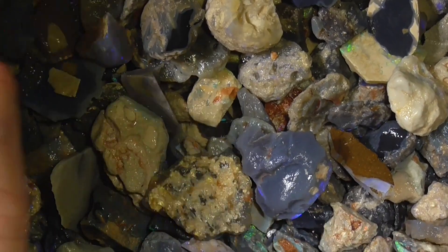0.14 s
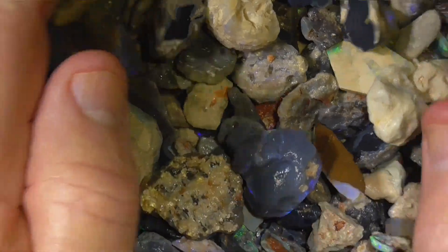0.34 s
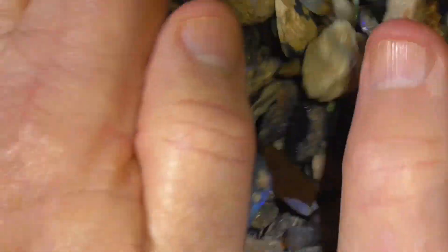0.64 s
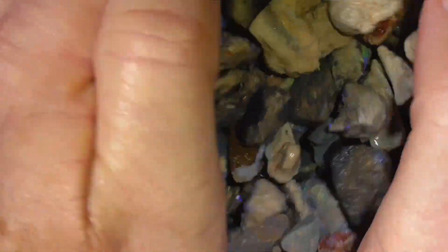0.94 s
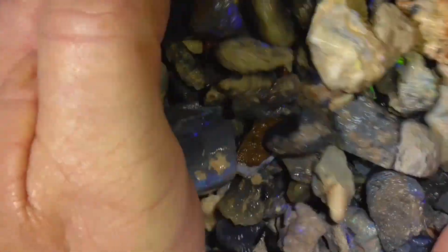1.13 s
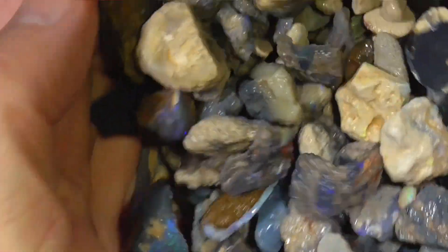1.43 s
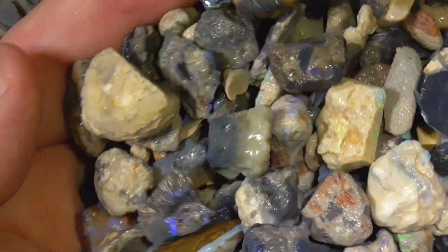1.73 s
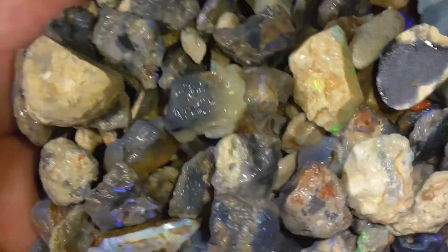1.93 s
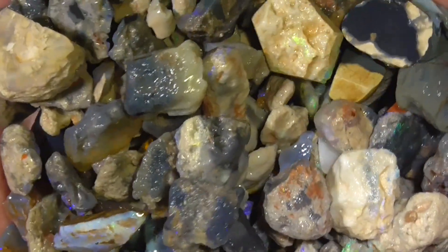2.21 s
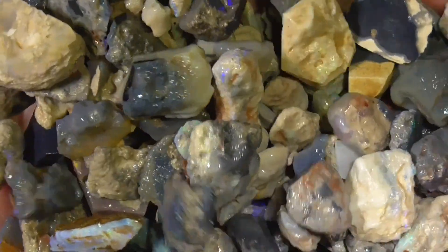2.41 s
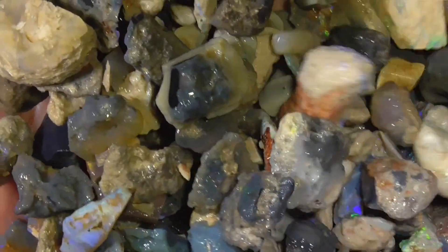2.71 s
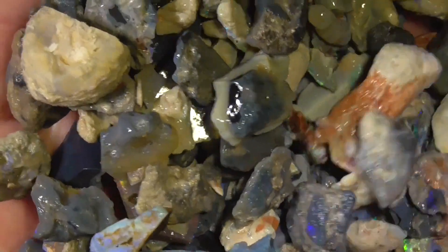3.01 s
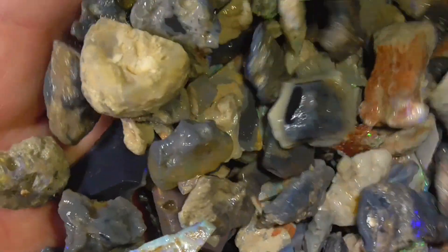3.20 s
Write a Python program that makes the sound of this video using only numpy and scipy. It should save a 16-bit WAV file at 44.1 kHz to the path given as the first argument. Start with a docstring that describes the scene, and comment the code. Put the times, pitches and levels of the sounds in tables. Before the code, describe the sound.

Small rough stones, very close and dry. A scrap of grinding fades at once to near quiet, then at 0.2 s a hand digs in with dense, crisp crunching and short scrapes. It brightens until a very hard clack at 1.27 s briefly ducks everything. A soft scrape follows around 1.5 s; thinner grinding carries scattered clacks, a hollow knock at 2.13 s, a flurry near 2.8 s and bright clinks after 3.05 s.

```python
"""Small rough stones grind in a tub as a hand digs in and lifts a handful, close to the microphone.
The grinding is made of countless tiny contacts, each rub passed through the short ring of a stone.
Single stones clack in bursts of noise and clink in pairs of sines; the tub answers with low, dull notes.
Soft scrapes of filtered slips, a short room tail and a faint steady hush lie around them.
One very hard clack makes the recorder's limiter duck, and the sound swells back."""
import sys
import numpy as np
from scipy import signal
from scipy.io import wavfile
from scipy.ndimage import uniform_filter1d

SR = 44100
rng = np.random.default_rng(int(sys.argv[2]) if len(sys.argv) > 2 else 0)


def output_pcm(signal):
    """Save a mono or channel-first signal as 16-bit PCM at the path in sys.argv[1].

    Samples are clipped to [-1, 1] before scaling.
    """
    pcm = np.clip(np.atleast_2d(signal).T, -1, 1) * 32767
    wavfile.write(sys.argv[1], SR, np.round(pcm).astype(np.int16))


N = 147735  # length in samples

# Tone colours of a contact: bright tick, middle crack and dull thud.
# Each row: frequency in Hz, relative level in dB per Hz.
TICK_COLOUR = [(2500, -76), (5000, -21), (6500, -7.5), (8200, 5.5), (10200, 6), (12200, -2), (14000, -5.5),
               (16000, -19)]
CRACK_COLOUR = [(100, -67), (1300, -13), (2050, 7), (4400, 3.5), (6500, 0.5), (10000, 1), (16000, -47.5)]
THUD_COLOUR = [(40, -22), (100, -17), (160, -7.5), (400, -9), (800, 3.5), (1400, -1.5), (2500, -3.5),
               (8000, -60.5)]

# How often one rubbing stone makes contact at the given body level; the rate doubles every so many dB
CONTACTS_PER_S, CONTACTS_DB, CONTACTS_DOUBLE_DB = 1800, -22, 12.5
# Contacts and rubs differ in size; a rub peaks after RUB_S
SIZE_SPREAD_DB, CLUMP_DB, RUB_S = 3, 1, 0.0091
# Each rub starts with one dry tick, a few of them much harder
TOUCH_DB, TOUCH_SPREAD_DB = -5.5, 5.5
STONE_LO_HZ, STONE_HI_HZ = 1100, 13030
STONE_T60_S, STONE_RING_DB, CHIP_T60_S = 0.024, -18.5, 0.0019
# Stereo width: level of the side signal for bright and for duller sounds
SIDE_TICK_DB, SIDE_BODY_DB = -15, -41
# Ring of the tub beside its thud: a whole stone rings it more than grinding does
TUB_DB, KNOCK_RING_DB = 6, 16.5
CRACK_DB, CRACK_FOLLOWS_TICKS = -0.5, 0.24  # the follow share is a fraction
# In a clack the faces scuff, meet and chatter; then the neighbours settle
CLACK_LEAD_S, CLACK_T60_S, SETTLE_DB, SETTLE_T60_S = 0.0048, 0.0099, -12, 0.078
GRIT_SPREAD_DB, THUD_CHATTER = 7.5, 0.43  # the thud chatter is a factor
SLIPS_PER_S = 2000
ROOM_DB, ROOM_T60_S = -17, 0.053
HUSH_DB = -50
LIMIT_DB, RECOVER_DB_PER_S = 2, 88.5
EDGE_HZ = 15900  # upper limit of the sound


def amp(db):
    """Turns dB into an amplitude factor."""
    return 10 ** (np.asarray(db) / 20)


def evened(x):
    """Scales a signal to an rms of 1."""
    return x / np.sqrt(np.mean(x ** 2) + 1e-20)


def steady(x, size=2600):
    """Divides out the slow swings in loudness, so that a level curve can shape the sound."""
    power = uniform_filter1d((x ** 2).mean(0), size)
    return x / np.sqrt(uniform_filter1d(power, size // 2) + 1e-12)


def topped(x, size):
    """Scales a hit so that its loudest moment has rms 1."""
    return x / np.sqrt(uniform_filter1d((x ** 2).mean(0), size).max())


def add(mix, s, sound):
    """Adds a sound at s seconds and cuts what runs past the end."""
    part = mix[:, round(s * SR):][:, :sound.shape[-1]]
    part += sound[..., :part.shape[1]]


def seconds(size):
    """Time of each sample in seconds."""
    return np.arange(size) / SR


def dying(t, t60):
    """Decay that falls by 60 dB in t60 seconds."""
    return np.exp(-np.log(1000) * t / t60)


def through(x, response):
    """Convolves each channel and keeps the length."""
    return signal.fftconvolve(np.atleast_2d(x), np.atleast_2d(response), axes=1)[:, :x.shape[-1]]


def colour(points, size=4096):
    """Causal impulse response of energy 1 with the given spectrum."""
    hz, db = np.transpose(points)
    grid_hz = abs(np.fft.fftfreq(size, 1 / SR)) + 1
    log_gain = np.log(amp(np.interp(np.log(grid_hz), np.log(hz), db)))
    # Minimum phase puts the energy as early as the spectrum allows
    h = np.fft.ifft(np.exp(np.conj(signal.hilbert(log_gain)))).real
    return h / np.linalg.norm(h)


def stereo(pair, side_db):
    """Left and right from a middle and a side signal."""
    return pair[0] + amp(side_db) * np.array([pair[1], -pair[1]])


def stone(size=1500, count=7):
    """One stone in its nook: a gritty snap and a few quickly damped modes, most of them high."""
    t = seconds(size)
    hz = STONE_LO_HZ * (STONE_HI_HZ / STONE_LO_HZ) ** np.sqrt(rng.random((count, 1)))
    phase = rng.random((2, count, 1))  # separate for middle and side
    modes = np.sqrt(hz / STONE_HI_HZ) * np.sin(2 * np.pi * (hz * t + phase))
    ring = modes.sum(1) * dying(t, STONE_T60_S)
    snap = rng.standard_normal((2, size)) * dying(t, CHIP_T60_S)
    h = snap + amp(STONE_RING_DB) * ring
    return h / np.linalg.norm(h[0])


def tub(ring_db):
    """Answer of the pile and its tub to one push: a dull thud and a few short modes."""
    # Ring of the tub. Each row: pitch in Hz, level in dB before filtering, time to fall 60 dB in s.
    tub_modes = [(337, -7, 0.041), (512.2, 1.5, 0.046), (684.6, -5.5, 0.073), (779, 1.5, 0.032),
                 (1150, 3, 0.005), (1497, -11, 0.11)]
    thud = colour(THUD_COLOUR)
    t = seconds(len(thud))
    ring = np.zeros(len(thud))
    for k, (hz, db, t60) in enumerate(tub_modes):
        ring += amp(db) * dying(t, t60) * np.sin(2 * np.pi * hz * t) * (-1) ** k
    # A difference lifts the treble, then a gentle lowpass above the first mode tames it
    ring = through(ring, np.array([1., -1.]))[0]
    ring = signal.lfilter([1], [1, -np.exp(-2 * np.pi * tub_modes[0][0] / SR)], ring)
    return thud + amp(ring_db) * ring / np.linalg.norm(ring)


def grinding(count=650, size=3500):
    """One stone after another rubs in a fit of tiny contacts; harder digging makes them denser."""
    # Loudness of the grinding pile.
    # Each row: time in s, level of the bright ticks in dB, level of the dull body in dB.
    grind_levels = [(0, -31, -34), (0.035, -42.5, -44), (0.061, -66, -53), (0.168, -69, -51.5),
                    (0.2, -23, -24), (0.292, -18.5, -24.5), (0.333, -24, -25), (0.368, -17.5, -22.5),
                    (.49, -19, -22.5), (.61, -24, -22), (.67, -17, -21), (.84, -17, -21.5),
                    (0.958, -23, -28.5), (0.997, -20, -26.5), (1.09, -15.5, -24), (1.159, -15.5, -26),
                    (1.19, -24, -27), (1.262, -12.5, -26.5), (1.3, -17.5, -26.5), (1.53, -25, -31.5),
                    (1.701, -19, -32.5), (1.746, -24, -36), (1.95, -25, -34), (1.985, -25.5, -34.5),
                    (2.03, -22.5, -32), (2.095, -29, -31.5), (2.302, -26, -32.5), (2.35, -28.5, -37.5),
                    (2.41, -34, -37), (2.46, -23.5, -39), (2.62, -31, -39.5), (2.75, -18, -38.5),
                    (2.825, -28, -35), (2.91, -23, -35), (2.98, -29.5, -38.5), (3.2, -32.5, -43),
                    (3.35, -43, -35.5)]
    s, tick_db, body_db = np.transpose(grind_levels)
    t, age = seconds(N), seconds(size) / RUB_S
    tick_db, body_db = np.interp(t, s, tick_db), np.interp(t, s, body_db)
    rate = CONTACTS_PER_S * 2 ** (np.maximum(body_db - CONTACTS_DB, -15) / CONTACTS_DOUBLE_DB)
    snaps = np.zeros((2, N))
    for start in (np.arange(count) + rng.random(count)) * N / count:
        size_db = SIZE_SPREAD_DB * np.minimum(rng.exponential(1, size), 4)
        size_db = size_db + CLUMP_DB * np.clip(rng.standard_normal(), -2, 2)
        happens = rng.random(size) < rate[int(start)] / SR
        contacts = happens * amp(size_db) * rng.choice([-1, 1], size)
        touch = (age == 0) * amp(TOUCH_DB + TOUCH_SPREAD_DB * min(rng.exponential(), 4))
        rub = touch + contacts * age * np.exp(-age)
        add(snaps, start / SR, through(rub, stone()))

    crack_db = CRACK_DB + body_db + CRACK_FOLLOWS_TICKS * (tick_db - body_db)
    pressed = np.sqrt(amp(np.minimum(body_db - CONTACTS_DB, 0)))  # harder digging rings the tub more
    near, low = stereo(snaps, SIDE_TICK_DB), stereo(snaps, SIDE_BODY_DB)
    ticks = steady(through(near, colour(TICK_COLOUR)))
    cracks = steady(through(low, colour(CRACK_COLOUR)))
    loose_body = (1 - pressed) * through(low, colour(THUD_COLOUR))
    ringing_body = pressed * through(low, tub(TUB_DB))
    body = steady(loose_body + ringing_body)
    return amp(tick_db) * ticks + amp(crack_db) * cracks + amp(body_db) * body


def hush():
    """A faint steady noise with its own tone colour lies under the stones."""
    # Tone colour of the hush. Each row: frequency in Hz, relative level in dB per Hz.
    hush_colour = [(50, -30.5), (350, 5.5), (1000, 1), (4000, -16)]
    noise = stereo(rng.standard_normal((2, N)), side_db=-7)
    return amp(HUSH_DB) * through(noise, colour(hush_colour))


def hand():
    """Slips under the hand sound hollows; their pitch falls as it closes in, rises as it lifts."""
    # Scrapes of stones sliding under the hand. Each row: middle in s, spread in s, pitch in Hz,
    # glide in octaves per s, width of the resonance in Hz, level in dB.
    scrapes = [(.135, 0.029, 352, -0.5, 70, -44.5), (0.302, 0.025, 2780, -41, 1100, -26),
               (.39, 0.051, 1700, -10, 1420, -25.5), (1.455, .012, 171, -18, 50, -35),
               (1.5, 0.085, 1460, 1.5, 260, -31), (1.54, 0.03, 665, 1, 512, -28.5),
               (2.73, 0.055, 4600, 0.5, 2680, -32.5)]
    t, out = seconds(N), np.zeros(N)
    for s, spread, hz, glide, width, db in scrapes:
        gliding_hz = hz * 2 ** np.clip(glide * (t - s), -1, 1)
        turn = np.exp(2j * np.pi * np.cumsum(gliding_hz) / SR)
        slips = rng.standard_normal(N) * (rng.random(N) < SLIPS_PER_S / SR)
        # Shift the gliding pitch down to zero, let it ring there, and shift it back
        ring = (turn * through(slips / turn, t * np.exp(-np.pi * width * t))[0]).real
        ring = signal.sosfilt(signal.butter(2, hz / 2, "highpass", fs=SR, output="sos"), ring)
        swell = np.exp(-.5 * ((t - s) / spread) ** 2)
        out += amp(db) * evened(ring) * swell
    return out


def clacks(size=5000):
    """Rough faces meet in a short chatter that rings the stone, cracks and thuds into the tub."""
    # Single stones knocking together. Each row: time in s, level of the bright tick in dB,
    # level of the middle crack in dB, level of the thud into the tub in dB.
    knocks = [(0.1979, -9.5, -47, -34), (0.297, -9, -22, -49), (.4864, -8, -38, -16),
              (0.895, -19, -16.5, -32), (1.2043, -12, -17.5, -54), (1.2701, -9, -4, -15),
              (1.4085, -9.5, -35, -23.5), (1.5285, -21, -25, -30), (1.641, -14, -18, -29.5),
              (1.6649, -12.5, -38, -53.5), (1.772, -9, -27, -46), (1.799, -12.5, -40, -45),
              (1.8340, -14.5, -19.5, -21.5), (1.842, -16, -38, -28), (1.881, -24, -20.5, -30.5),
              (2.0806, -12, -31, -53), (2.1297, -26, -14.5, -15), (2.146, -12, -20, -25),
              (2.1773, -9.5, -35, -31), (2.2450, -18, -16, -21.5), (2.2849, -9, -29, -25),
              (2.3754, -8.5, -29, -39), (2.3804, -14.5, -25, -36.5), (2.422, -14.5, -24, -31.5),
              (2.427, -13, -42, -41), (2.544, -23, -40, -34.5), (2.628, -19.5, -29, -33),
              (2.7712, -9, -21, -32), (2.7873, -7.5, -26, -29), (2.7940, -12, -20.5, -27),
              (2.8049, -16, -32, -31), (2.9342, -13, -31, -29.5), (3.069, -26, -23.5, -39),
              (3.0794, -14, -18.5, -19), (3.1279, -17, -26.5, -33.5), (3.1624, -11, -21.5, -34.5),
              (3.2165, -18.5, -37, -69), (3.2369, -12, -8, -29), (3.3250, -40, -24, -28.5)]
    out, lead = np.zeros((2, N)), round(CLACK_LEAD_S * SR)
    t = seconds(size) - lead / SR  # zero when the faces meet
    tick_colour, crack_colour = colour(TICK_COLOUR), colour(CRACK_COLOUR)
    tub_answer = tub(KNOCK_RING_DB)
    scuff = dying(abs(t), CLACK_LEAD_S)
    settling = dying(abs(t), SETTLE_T60_S)
    shape = np.where(t < 0, scuff, dying(abs(t), CLACK_T60_S) + amp(SETTLE_DB) * settling)
    for s, tick_db, crack_db, thud_db in knocks:
        grit = amp(GRIT_SPREAD_DB * np.clip(rng.standard_normal(size), -2, 2))
        chatter = rng.standard_normal((2, size)) * grit * shape
        chatter = chatter + 0.29 * through(chatter, stone())
        push = stereo(chatter, SIDE_BODY_DB)
        impact = np.arange(size) == lead
        blow = impact + THUD_CHATTER * settling * push / np.linalg.norm(push[0])
        tick = topped(through(stereo(chatter, SIDE_TICK_DB), tick_colour), size=50)
        crack = topped(through(push, crack_colour), size=60)
        thud = topped(through(blow, tub_answer), size=180)
        clack = amp(tick_db) * tick + amp(crack_db) * crack + amp(thud_db) * thud
        add(out, s - CLACK_LEAD_S, clack)
    return out


def clinks(size=5000):
    """A dense stone rings on with a close pair of modes."""
    # Dense stones that ring on.
    # Each row: start in s, pitch in Hz, level in dB, time to fall 60 dB in s.
    ringing_stones = [(0.7836, 3150, -14, 0.013), (1.2694, 12170, 26, 0.0056), (1.7718, 11930, -19, 0.089),
                      (3.0722, 12100, -7, 0.019), (3.1274, 12200, -24, 0.067), (3.162, 12100, -11, 0.047),
                      (3.234, 7930, -12, 0.016), (3.237, 1450, -16.5, 0.038)]
    out, t = np.zeros((2, N)), seconds(size)
    sides = amp(np.array([[-1.2], [1.2]]))  # a little louder on the right
    for s, hz, db, t60 in ringing_stones:
        second_hz = hz + rng.choice([-1, 1]) * rng.uniform(86, 290)
        pair = np.sin(2 * np.pi * hz * t) + 0.8 * np.sin(2 * np.pi * second_hz * t)
        add(out, s, amp(db) * dying(t, t60) * pair * sides)
    return out


def bumps():
    """The whole tub gives a short low note, with a soft start, under a few hard knocks."""
    # Low notes of the tub.
    # Each row: start in s, pitch in Hz, level in dB, time to fall 60 dB in s.
    low_notes = [(2.1297, 543, -9, 0.11), (3.2367, 313, -20, 0.02), (3.2375, 495, -24, 0.12)]
    out, t = np.zeros((2, N)), seconds(N)
    for s, hz, db, t60 in low_notes:
        swell_and_fade = dying(t, t60) - dying(t, t60 / 10)
        add(out, s, amp(db) * swell_and_fade * np.sin(2 * np.pi * hz * t))
    return out


def room(x, size=16384):
    """A small room: a short, diffuse tail of decaying noise."""
    t = seconds(size)
    fade_in = np.minimum(t / 0.036, 1)
    tail = rng.standard_normal((2, size)) * dying(t, ROOM_T60_S) * fade_in
    return through(x, tail / np.linalg.norm(tail[0]))


def scene():
    """All stone and tub sounds, their weak room tail and the hush."""
    stones = grinding() + hand() + clacks() + clinks() + bumps()
    return stones + amp(ROOM_DB) * room(stones) + hush()


def record(dry):
    """A limiter ducks at once and recovers slowly; then full scale and the band limit."""
    power_db = 10 * np.log10(abs(uniform_filter1d((dry ** 2).mean(0), size=40)) + 1e-12)
    # The highest level so far is held, sinking steadily until a louder sound replaces it
    fall = seconds(N) * RECOVER_DB_PER_S
    held_db = np.maximum.accumulate(power_db + fall) - fall
    over_db = np.maximum(held_db - LIMIT_DB, 0)
    limited = np.clip(dry / amp(over_db), -1, 1)
    lowpass = signal.firwin(511, EDGE_HZ, window=("kaiser", 9), fs=SR)
    return signal.oaconvolve(limited, lowpass[None], "same")


dry = scene()
out = record(dry)
output_pcm(out)
```